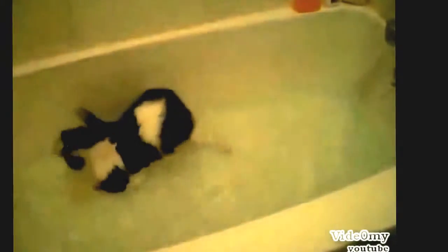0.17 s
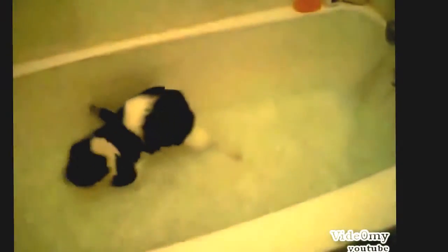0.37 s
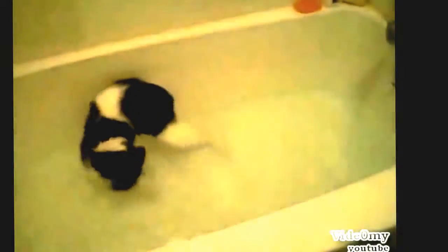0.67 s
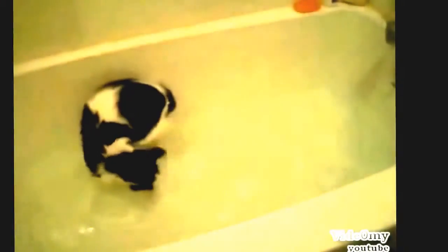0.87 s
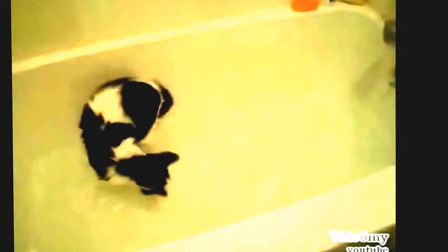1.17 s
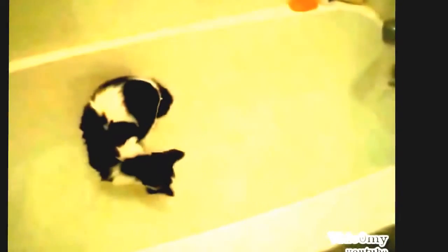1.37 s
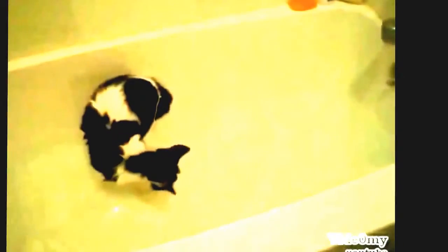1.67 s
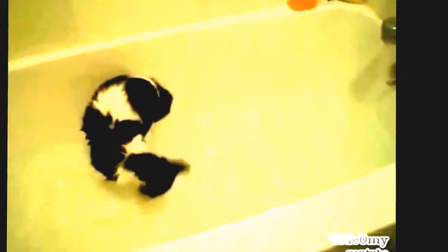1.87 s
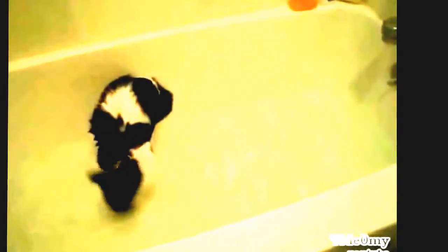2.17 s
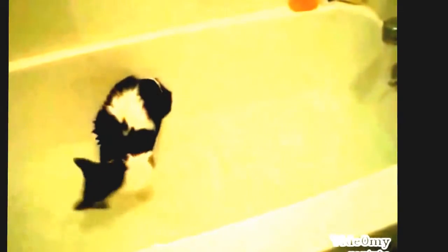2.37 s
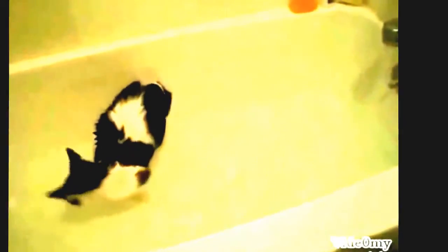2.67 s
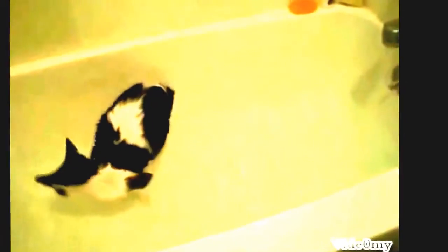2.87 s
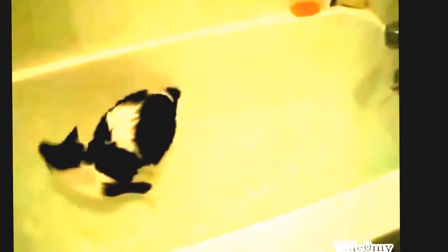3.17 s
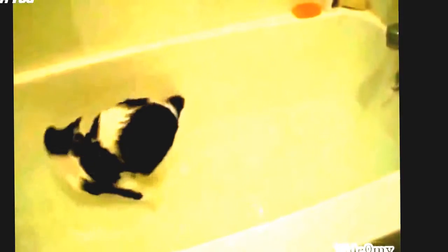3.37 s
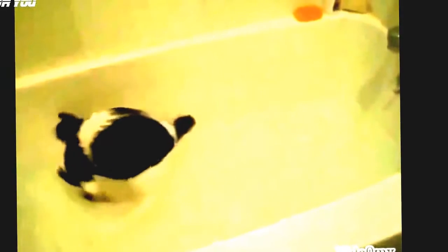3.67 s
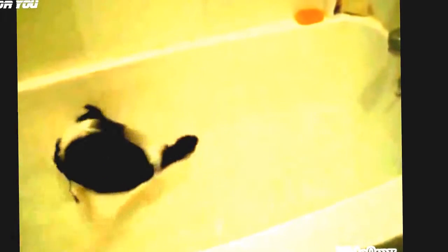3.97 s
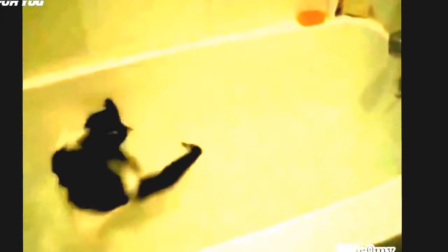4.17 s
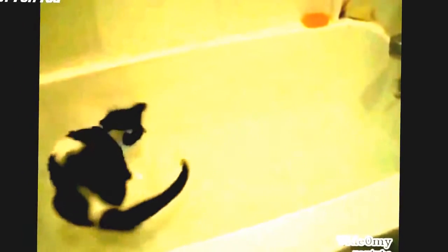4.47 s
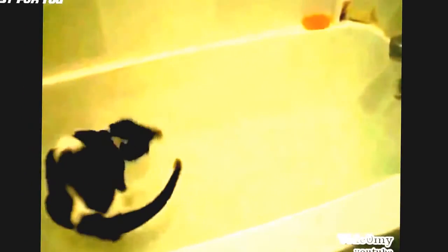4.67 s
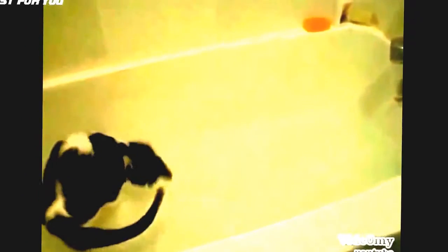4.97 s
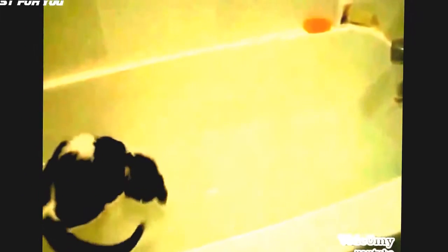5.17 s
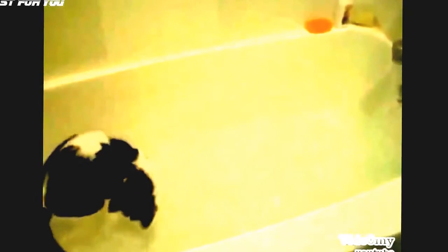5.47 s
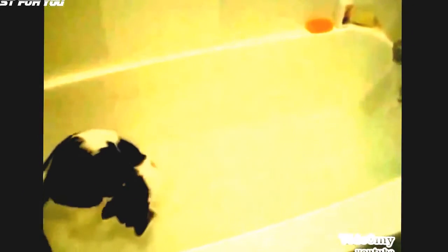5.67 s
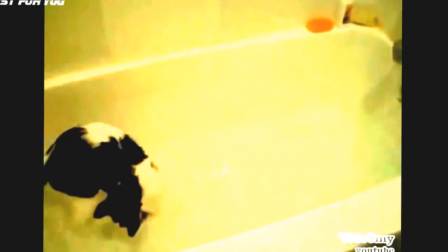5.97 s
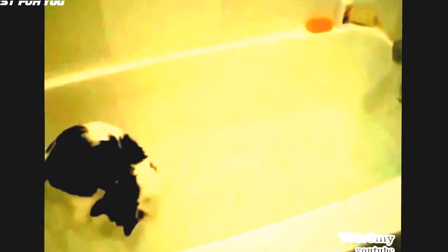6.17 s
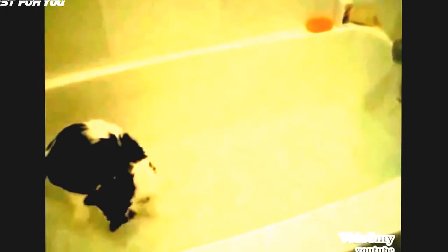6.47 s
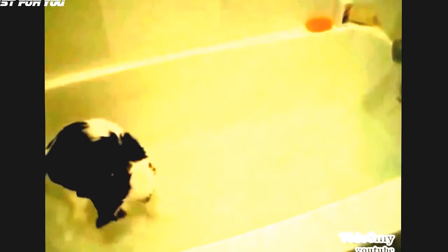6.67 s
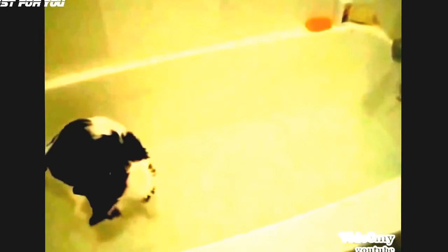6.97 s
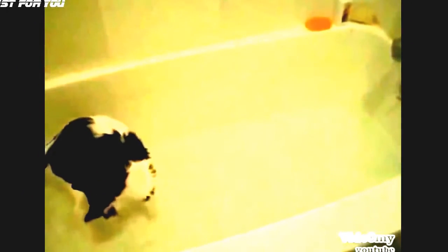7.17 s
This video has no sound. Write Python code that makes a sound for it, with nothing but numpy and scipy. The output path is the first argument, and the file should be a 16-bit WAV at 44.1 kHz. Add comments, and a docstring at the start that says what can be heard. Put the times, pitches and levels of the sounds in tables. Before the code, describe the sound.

Water pours steadily from a tap into a part-filled bathtub while a cat wades, with paw splashes, bubbly gulps, soft tub knocks and drips.

```python
"""Cat wading in a running bath

A tap runs into a part-filled bathtub in a small bathroom while a cat wades in the water.
Inflow: shaped noise and shaken tub modes drone; a surface of ringing bubbles and noise fizzes.
Paws: noise-and-froth splashes, ringing air pockets, bubble strings, hollow bloops, bumps on the tub modes.
Drops from wet fur tick and ping. The whole is narrow-band, with little left above 7 kHz."""
import sys
import numpy as np
from scipy import signal
from scipy.fft import rfft, irfft
from scipy.io import wavfile

SR = 44100
rng = np.random.default_rng(int(sys.argv[2]) if len(sys.argv) > 2 else 0)


def master(y):
    """Save y as 16-bit WAV."""
    cut = np.clip(np.atleast_2d(y).T, -1, 1)
    pcm = np.round(cut * 32767)  # scale
    wavfile.write(sys.argv[1], SR, pcm.astype(np.int16))


N = 321930
TIME = np.arange(N) / SR

# Table levels are relative: layer gains, hollow and room act after them.
# paw splashes: t/s, level/dB, rise/s, t60/s, spray low-pass f/Hz
SPLASHES = [(0.052, -22.5, 0.005, 0.41, 2100), (0.101, -25, 0.013, .12, 1600),
            (0.139, -25.5, 0.008, 0.17, 1500), (0.187, -34, .004, 0.081, 3000),
            (0.565, -34, .0055, .4, 600), (0.679, -29, 0.0032, .18, 3970), (0.745, -28, 0.025, 0.46, 1000),
            (0.865, -32.5, 0.0073, 0.12, 2600), (1.059, -25.5, 0.014, 0.1, 1600),
            (1.26, -24, 0.017, 0.23, 3200), (1.299, -15.5, 0.013, 0.056, 1400),
            (1.328, -27.5, 0.01, 0.33, 950), (2.336, -33, 0.011, 0.089, 1105),
            (2.348, -30, 0.0035, 0.069, 2200), (4.21, -25.5, 0.0038, 0.14, 2400),
            (5.108, -33, 0.024, .25, 700), (5.215, -33, 0.017, 0.51, 1790),
            (6.165, -28.5, 0.035, 0.19, 1900)]
# large trapped air pockets: t/s, f/Hz, level/dB, t60/s, plop re ring level/dB
POCKETS = [(0.053, 415, -5, 0.036, -7.5), (0.056, 1290, -18.5, 0.035, -6), (0.072, 436, -14, 0.052, -7),
           (0.092, 410, -17.5, 0.034, -9), (0.107, 440, -15.5, 0.022, -2), (0.142, 416, -15.5, 0.032, -6),
           (0.566, 575, -18.5, 0.14, -6), (0.567, 1000, -20.5, 0.051, -8), (0.629, 1320, -25, 0.063, 0.5),
           (0.666, 1390, -24.5, 0.032, -1), (0.714, 836, -12.5, 0.023, -7.5), (0.773, 810, -22, 0.025, -8),
           (1.3102, 1095, -12, 0.026, -4.5), (1.312, 1530, -14.5, 0.034, -6), (1.319, 651, -14.5, 0.074, 0),
           (1.323, 294, -16, 0.043, -4.5), (1.338, 1530, -20.5, 0.045, -6), (2.336, 326, -19.5, 0.045, -11),
           (2.341, 536, -25, 0.026, 3), (3.298, 1310, -24, 0.051, -8), (5.127, 930, -24, 0.033, -9),
           (5.217, 420, -23, .06, -7), (5.35, 1645, -21, 0.049, -10), (7.226, 413, -13, 0.044, -8.5),
           (7.241, 780, -22, .04, -6)]
# bubble strings dragged under by a paw: t/s, length/s, first f/Hz, last f/Hz, level/dB
GURGLES = [(0.062, 0.05, 477, 490, -22.5), (0.115, 0.11, 1150, 950, -33.5), (0.576, 0.091, 605, 540, -32),
           (0.728, .14, 980, 700, -35), (1.074, 0.077, 880, 1120, -35), (1.236, 0.022, 1170, 1900, -32),
           (1.314, 0.064, 1550, 1390, -35), (1.559, 0.046, 1350, 1300, -35.5),
           (2.105, 0.048, 1400, 1800, -32.5), (3.618, 0.081, 1400, 1350, -36.5),
           (3.871, 0.053, 1750, 1150, -39.5), (4.891, 0.027, 1570, 1190, -31.5),
           (5.097, 0.027, 1650, 1300, -33.5), (5.165, 0.086, 620, 420, -31),
           (6.687, 0.051, 1900, 1150, -38), (7.07, 0.11, 925, 1400, -38)]
# slow bloops, a paw drawing a cavity under: t/s, length/s, first f/Hz, last f/Hz, level/dB
BLOOPS = [(0.339, 0.025, 1253, 1310, -31), (0.399, 0.036, 680, 700, -31.5), (1.254, .016, 1640, 1700, -28),
          (1.58, 0.025, 1268, 1245, -28.5), (1.98, 0.026, 656, 680, -27), (1.998, 0.029, 745, 716, -29),
          (2.358, .02, 1900, 1760, -29.5), (5.124, 0.041, 1128, 1118, -24), (5.17, 0.023, 615, 556, -30),
          (5.206, 0.041, 414, 444, -25.5), (6.163, .042, 658, 663, -22), (6.22, 0.028, 660, 665, -25.5),
          (6.751, 0.015, 1180, 1230, -24.5), (7.163, 0.012, 1330, 1290, -31)]
# bumps against the tub: t/s, level/dB, contact/s
BUMPS = [(0.68, -10, 0.0046), (0.697, -19.5, 0.0036), (0.747, -17.5, 0.0063), (0.799, -19, 0.0072),
         (1.005, -18.5, 0.0054), (1.085, -16, 0.007), (1.121, -25, 0.0049), (1.321, -16.5, 0.014),
         (1.348, -17.5, 0.0064), (1.398, -17.5, .006), (1.54, -21, 0.012), (1.644, -23, 0.0075),
         (1.727, -21, 0.013), (2.33, -26, 0.0053), (2.908, -26, 0.0072), (3.643, -20.5, 0.0064),
         (3.715, -27, 0.005), (7.273, -19.5, 0.0062)]
# loudest drops hitting the water: t/s, ping level/dB, ping f/Hz, tick level/dB
DROPS = [(0.002, -24.5, 2450, -28.5), (0.077, -21, 2900, -31), (0.107, -20, 2200, -38),
         (0.143, -19, 2150, -39.5), (0.153, -20, 2550, -44), (0.191, -30, 3030, -35),
         (0.3183, -16, 2240, -28.5), (0.421, -27, 5430, -42), (0.5213, -22, 2700, -40),
         (0.6796, -24, 2080, -27), (0.765, -25, 2110, -42), (0.9582, -24.5, 3060, -51),
         (1.137, -23, 4200, -42), (1.2653, -11.5, 1760, -31), (1.274, -25, 5170, -29),
         (1.3158, -15, 1900, -24.5), (1.402, -27, 2290, -37), (1.541, -25, 2540, -38),
         (1.559, -20.5, 5500, -39), (1.6651, -19.5, 1940, -36.5), (1.9131, -32, 2960, -45.5),
         (2.0308, -16, 5140, -26.5), (2.802, -30, 2180, -32.5), (2.877, -18, 1640, -52),
         (2.9162, -16.5, 1730, -53), (2.9506, -19.5, 2280, -41.5), (3.166, -22.5, 2200, -38),
         (3.392, -21, 2730, -53), (3.5712, -22, 4970, -31.5), (3.629, -21.5, 1570, -34.5),
         (3.6883, -24, 2840, -33), (4.211, -20, 1830, -35), (4.4473, -17, 2250, -37),
         (4.5664, -21.5, 2390, -37), (4.6783, -16, 2650, -23.5), (4.7775, -21, 3160, -44),
         (5.037, -27, 1740, -34.5), (5.153, -22, 3740, -33), (5.2069, -19, 3610, -37),
         (5.3901, -20.5, 3080, -32), (5.506, -22, 2500, -30.5), (5.538, -16.5, 2250, -29.5),
         (5.9492, -25, 3080, -45), (5.967, -21, 3150, -37), (6.16, -21.5, 2080, -47),
         (6.207, -19, 2330, -36), (6.482, -23, 1390, -39), (6.689, -22, 2020, -50),
         (6.78, -15.5, 2440, -28), (6.782, -17, 4200, -26.5), (6.9673, -15.5, 3060, -32),
         (7.259, -17.5, 2200, -26.5)]
# how hard the stream churns the surface: t/s, level/dB
CHURN_LEVEL = [(0.0, -33.5), (0.28, -36.5), (0.55, -36), (0.73, -33.5), (1.26, -34), (1.36, -38),
               (1.93, -37.5), (2.27, -34.5), (2.66, -37), (2.99, -37.5), (4.17, -37.5), (4.61, -37.5),
               (4.96, -37), (5.35, -35.5), (5.65, -36.5), (7.3, -36)]
# colour of the churning surface: f/Hz, level/dB
CHURN_COLOUR = [(500, -11.5), (750, -1.5), (950, -0.5), (1350, -1), (1700, 0), (2200, -3), (2700, -3),
                (3100, -6), (3700, -8), (4300, -10), (5000, -10.5), (6000, -11.5)]
# colour of the drone: f/Hz, level/dB
DRONE_COLOUR = [(60, -1.5), (120, -5.5), (200, 4), (290, -0.5), (340, -0.5), (420, -3.5), (530, -1),
                (600, -7.5), (700, -7), (820, -11), (1500, -33.5)]
# deep boom: t/s, level/dB
BOOM_LEVEL = [(0, -39.5), (1.9, -39.5), (2.9, -40.5), (3.3, -43), (4.15, -41), (4.8, -35), (5.3, -39),
              (5.85, -37), (6.6, -41), (6.9, -36.5), (7.3, -42)]
# deepest modes of the filled tub: f/Hz, width/Hz, level/dB
TUB_LOW = [(37, 6.6, -6.5), (54.5, 8.8, -4), (81.9, 11.6, 1)]
# higher modes of tub and room: f/Hz, width/Hz, level/dB
TUB_HIGH = [(127.5, 12, -2.5), (165.4, 5.8, 1.5), (187, 2, -10.5), (211, 3.44, 3), (257.1, 8.1, -1),
            (305.7, 13.3, -4), (353, 4.1, -13.5), (404.6, 12.6, -3), (472.3, 14, -8), (520, 18, -8.5)]
# resonances of the hollow above the water: f/Hz, width/Hz, gain at the peak/dB
HOLLOW = [(1084, 35, -6), (1070, 36, 0), (1330, 84, 3), (1685, 99, 2), (2150, 150, 3.5), (2960, 170, 3),
          (3220, 110, 3.5), (4200, 110, 0.5)]

# pocket break-up: remnant delay as a share of t60, smaller satellite higher up
REMNANT_AFTER_T60, REMNANT_LOSS_DB, REMNANT_DETUNE_OCTAVES = 0.4, 9.5, 0.032
SATELLITE_DELAY_S, SATELLITE_PITCH_RATIO, SATELLITE_LOSS_DB = 0.004, 2.5, 18
# rocking water after a bump, level re bump
SLOSH_DB, SLOSH_T60_S = -10, 0.95
# fainter random drops, levels on the scale of DROPS
DRIPS_PER_S, DRIP_PING_DB, DRIP_TICK_DB, DRIP_SPREAD_DB = 4, -31, -43, 2.5
DRIP_HZ, DRIP_SPREAD_OCTAVES = 2200, 0.35
# drone gain at mean churn; share of the churn's dB swing it follows
DRONE_DB, DRONE_FOLLOWS = -31.5, 0.79
ROOM_T60_S, ROOM_DB = 0.38, -6.5
STOP_EDGE_HZ, CUTOFF_HZ = 6250, 7000


def from_db(db):
    """Amplitude factor of a level in dB."""
    return 10 ** (np.asarray(db) / 20)


def rms_one(x):
    """Scale to rms 1."""
    return x / np.sqrt(np.mean(x ** 2) + 1e-20)


def peak_one(x):
    """Scale to peak 1."""
    return x / (np.abs(x).max() + 1e-20)


def in_time(rows):
    """Level curve at every sample."""
    s, db = np.transpose(rows)
    return np.interp(TIME, s, db)


def at_hz(points, hz):
    """Spectrum level read on a log-frequency axis."""
    known_hz, db = np.transpose(points)
    return np.interp(np.log(hz + 1e-9), np.log(known_hz), db)


def dying(t, t60):
    """Exponential decay, 60 dB in t60 seconds."""
    return np.exp(-np.log(1000) * t / t60)


def add(out, s, wave):
    """Mix a wave in at time s."""
    start = max(0, round(s * SR))
    out[start:start + len(wave)] += wave[:max(0, N - start)]


def cut(x, hz, kind, order=2):
    """Butterworth high- or low-pass."""
    return signal.sosfilt(signal.butter(order, min(hz, .45 * SR), kind, fs=SR, output="sos"), x)


def resonate(x, hz, width_hz):
    """Two-pole resonance, gain 1 on top."""
    r = np.exp(-np.pi * width_hz / SR)
    zeros = np.array([1, 0, -1]) * (1 - r * r) / 2
    poles = [1, -2 * r * np.cos(2 * np.pi * hz / SR), r * r]
    return signal.lfilter(zeros, poles, x + 1e-18)


def drift(per_s):
    """Random knots per_s times a second, joined by lines; rms 1."""
    knots = rng.standard_normal(2000)
    return rms_one(np.interp(TIME * per_s, np.arange(len(knots)), knots))


def noise(spectrum):
    """Steady noise of a given colour; rms 1."""
    hz = np.arange(N // 2 + 1) * SR / N
    return rms_one(irfft(rfft(rng.standard_normal(N)) * from_db(at_hz(spectrum, hz)), N))


def shaken(modes):
    """Modes kept ringing by turbulence; rms 1."""
    push = rng.standard_normal(N + SR)
    ringing = sum((-1) ** k * from_db(db) * resonate(push, hz, width)
                  for k, (hz, width, db) in enumerate(modes))
    return rms_one(ringing[SR:])  # drop the build-up


def scatter(x, t60, echo_db):
    """Direct sound plus a dense cloud of reflections from hard walls."""
    t = TIME[:SR // 2]
    echoes = rng.standard_normal(len(t)) * dying(t, t60) * (1 - dying(t, t60 / 10))
    return x + from_db(echo_db) * signal.fftconvolve(x, echoes / np.linalg.norm(echoes))[:len(x)]


def bubble(hz, t60, rise_per_s, pinch_s):
    """An air pocket pinches off and rings, rising in pitch as it nears the surface."""
    t = TIME[:round(min(t60, .3) * SR) + 2]
    tone = np.sin(2 * np.pi * hz * (t + rise_per_s * t * t / 2))
    return tone * dying(t, t60) * (1 - np.exp(-t / pinch_s))


def splashes(grain_db, clump_db, spray_db, froth_db):
    """A paw tears the surface into clumps of droplets and ringing froth that thin out."""
    out, t = np.zeros(N), TIME[:SR // 2]
    bubbles = fizz(per_s=1200, cycles=12, size_db=3.5, clump_db=1.5)
    for s, db, rise, t60, bright_hz in SPLASHES:
        grains = from_db(grain_db * np.minimum(rng.exponential(1, len(t)), 6))
        droplets = rng.standard_normal(len(t)) * grains
        spray = cut(droplets, bright_hz, "low", order=1)
        spray = cut(cut(spray, 310, "high"), 6000, "low", order=4)
        froth = cut(np.roll(bubbles, -round(s * SR))[:len(t)], 2 * bright_hz, "low", order=1)
        clumps = from_db(clump_db * drift(140)[:len(t)])
        swell = np.minimum(t / rise, 1) * dying(np.maximum(t - rise, 0), t60)
        burst = from_db(spray_db) * rms_one(spray * clumps) + from_db(froth_db) * rms_one(froth)
        add(out, s, from_db(db) * swell * burst)
    return out


def pockets(rise_per_s, pinch_s, plop_width):
    """A large pocket rings out of the rough plop of the closing cavity; plop_width is a share of pitch."""
    out, t = np.zeros(N), TIME[:SR // 4]
    for s, hz, db, t60, plop_db in broken_pockets():
        rough = rng.standard_normal(len(t)) * dying(t, t60) * (1 - np.exp(-t / pinch_s))
        plop = resonate(rough, hz, plop_width * hz)
        add(out, s, from_db(db - 4.5) * peak_one(bubble(hz, t60, rise_per_s, pinch_s)))
        add(out, s, from_db(db + plop_db) * peak_one(plop))
    return scatter(out, t60=0.017, echo_db=-11.5)


def broken_pockets():
    """Each pocket breaks up: its remnant rings again, a small satellite rings higher; rows as POCKETS."""
    rows = []
    chance = rng.standard_normal((len(POCKETS), 2))
    for (s, hz, db, t60, plop_db), (detune, size) in zip(POCKETS, chance):
        remnant_hz = hz * 2 ** (REMNANT_DETUNE_OCTAVES * detune)
        satellite_hz = hz * SATELLITE_PITCH_RATIO * 2 ** (.2 * size)
        rows += [(s, hz, db, t60, plop_db),
                 (s + REMNANT_AFTER_T60 * t60, remnant_hz, db - REMNANT_LOSS_DB, t60, plop_db),
                 (s + SATELLITE_DELAY_S, satellite_hz, db - SATELLITE_LOSS_DB,
                  t60 / SATELLITE_PITCH_RATIO, plop_db)]
    return rows


def gurgles(per_s, spread_octaves, cycles):
    """Bubbles follow each other closely; their pitch, set by size, drifts along the string."""
    out = np.zeros(N)
    for s, length, first_hz, last_hz, db in GURGLES:
        string, places = np.zeros(N), np.arange(0, 1, 1 / max(per_s * length, 2))
        for place, (late, detune, strength) in zip(places, rng.standard_normal((64, 3))):
            hz = first_hz * (last_hz / first_hz) ** place * 2 ** (spread_octaves * detune)
            ring = bubble(hz, cycles / hz, rise_per_s=2.5, pinch_s=0.00038)
            add(string, s + place * length + 0.002864 * abs(late), from_db(2.6 * strength) * ring)
        # rms 1 over the string's length
        out += from_db(db) * string * np.sqrt(length * SR / (np.sum(string ** 2) + 1e-20))
    return scatter(out, t60=0.071, echo_db=-2.0)


def bloops(swell_share, flutter, flutter_per_s, shudder_db):
    """A slowly closing cavity sings one hollow note that swells, wavers and fades."""
    out = np.zeros(N)
    for s, length, first_hz, last_hz, db in BLOOPS:
        place = TIME[:round(length * SR)] / length
        waver = 1 + flutter * drift(flutter_per_s)[:len(place)]
        hz = first_hz * (last_hz / first_hz) ** place * waver
        swell = np.sin(np.pi * np.interp(place, [0, np.clip(swell_share, .05, .9), 1], [0, .5, 1]))
        level = from_db(db + shudder_db * drift(flutter_per_s)[:len(place)])
        add(out, s, level * swell * np.sin(2 * np.pi * np.cumsum(hz) / SR))
    return out


def bumps(damping, high_modes_db):
    """A soft push sets the tub modes ringing, the deep ones most; the water rocks on after it."""
    out, rocking_power, t = np.zeros(N), np.zeros(N), TIME[:SR]
    for s, db, contact in BUMPS:
        push = np.sin(np.pi * np.minimum(t / contact, 1))
        low, high = (sum(from_db(mode_db) * resonate(push, hz, width * damping)
                         for hz, width, mode_db in modes) for modes in (TUB_LOW, TUB_HIGH))
        add(out, s, from_db(db) * peak_one(low + from_db(high_modes_db) * high))
        add(rocking_power, s, (from_db(db + SLOSH_DB) * dying(t, SLOSH_T60_S)) ** 2)
    return out + np.sqrt(rocking_power) * cut(shaken(TUB_LOW), 110, "low")


def drops(cycles, swell_s, tick_t60, tick_gain_db, ping_gain_db, crack_db, crack_t60):
    """A drop ticks, sharpest at first touch, and sets a tiny bubble pinging; the tub walls smear both."""
    out, t = np.zeros(N), TIME[:SR // 8]
    for s, db, hz, tick_db in DROPS + drips(count=100):
        impact = rng.standard_normal(len(t)) * (dying(t, tick_t60) + from_db(crack_db) * dying(t, crack_t60))
        tick = cut(cut(impact, 2300, "high"), 6000, "low", order=4)
        ping = np.sin(2 * np.pi * hz * t) * dying(t, cycles / hz) * (1 - np.exp(-t / swell_s))
        tick = peak_one(scatter(tick, t60=0.081, echo_db=-1.5))
        ping = peak_one(scatter(ping, t60=0.031, echo_db=3.0))
        add(out, s, from_db(tick_db + tick_gain_db) * tick)
        add(out, s, from_db(db + ping_gain_db) * ping)
    return out


def drips(count):
    """Fainter drops fall at random from the wet fur; rows as DROPS."""
    when = rng.random(count) * count / DRIPS_PER_S
    rows = []
    for s, (size, pitch, impact) in zip(when, rng.standard_normal((count, 3))):
        if s < N / SR:
            rows.append((s, DRIP_PING_DB + DRIP_SPREAD_DB * size,
                         DRIP_HZ * 2 ** (DRIP_SPREAD_OCTAVES * pitch),
                         DRIP_TICK_DB + DRIP_SPREAD_DB * impact))
    return rows


def churn(churn_db):
    """Fizz, chirping bubbles and plinks over a smooth rush; all surge as the stream lands unevenly."""
    fine = from_db(-2.5) * fizz(per_s=1100, cycles=15.8, size_db=4.0, clump_db=3.5)
    chirps = from_db(-10.5) * trickle(per_s=110, centre_hz=2209, spread_octaves=1.484, cycles=50, size_db=8.5)
    plinks = from_db(-8.5) * trickle(per_s=32, centre_hz=1900, spread_octaves=0.9, cycles=20, size_db=6.0)
    rush = from_db(-5) * cut(noise(CHURN_COLOUR), 550, "high")
    return from_db(churn_db + 0.22 * drift(27)) * (fine + chirps + plinks + rush)


def fizz(per_s, cycles, size_db, clump_db):
    """Small bubbles born in clumps, each ringing briefly at one of 30 pitches; rms 1."""
    pitches_hz = np.geomspace(650, 5800, num=30)
    born = np.flatnonzero(rng.random(N) < per_s * from_db(clump_db * drift(28)) / SR)
    chance = rng.random((len(born), 3))
    sizes = from_db(-size_db * np.log(np.maximum(chance[:, 0], .015))) * np.sign(chance[:, 1] - .5)
    dealt, out = (chance[:, 2] * len(pitches_hz)).astype(int), 0
    for k, hz in enumerate(pitches_hz):
        clicks = np.zeros(N)
        clicks[born[dealt == k]] = sizes[dealt == k]
        ringing = rms_one(resonate(clicks, hz, 2 * hz / cycles))
        out = out + from_db(at_hz(CHURN_COLOUR, hz)) * np.sqrt(hz) * ringing
    return rms_one(scatter(out, t60=0.08, echo_db=2.5))


def trickle(per_s, centre_hz, spread_octaves, cycles, size_db):
    """Middling bubbles from the inflow chirp upward, one by one; rms 1."""
    out = np.zeros(N)
    chance = rng.random((3000, 4))
    for when, pitch, strength, rise in chance[:round(per_s * N / SR)]:
        hz = centre_hz * 2 ** (spread_octaves * (2 * pitch - 1))
        level = from_db(size_db * strength + at_hz(CHURN_COLOUR, hz)) * np.sqrt(hz)
        add(out, when * N / SR, level * bubble(hz, cycles / hz, 7 * rise, 0.00015))
    return rms_one(scatter(out, t60=0.11, echo_db=-1.5))


def drone(drone_db, boom_db):
    """The inflow shakes the tub and the air of the room."""
    body = from_db(-2.0) * noise(DRONE_COLOUR) + from_db(-3.0) * shaken(TUB_HIGH)
    boom = cut(cut(shaken(TUB_LOW), 140, "low"), 35, "high", order=6)
    return from_db(drone_db) * cut(body, 64, "high") + from_db(boom_db + 4.5) * boom


def hollow(x):
    """The trough of the tub colours what sounds inside it: most of its pitches lift, one dips."""
    return x + sum((from_db(db) - 1) * resonate(x, hz, width) for hz, width, db in HOLLOW)


def scene():
    """Wading and running water, coloured by the tub; the room reflects the splashes, drops and gulps."""
    spatter = splashes(grain_db=4.5, clump_db=3.5, spray_db=-3.5, froth_db=-6.5)
    spatter = spatter + drops(cycles=18.5, swell_s=0.00054, tick_t60=0.025, tick_gain_db=11.0,
                              ping_gain_db=-4.0, crack_db=5, crack_t60=0.0025)
    gulps = pockets(rise_per_s=0.75, pinch_s=0.0025, plop_width=0.13)
    gulps = gulps + from_db(-3.5) * gurgles(per_s=130, spread_octaves=0.12, cycles=11.5)
    gulps = gulps + bloops(swell_share=0.35, flutter=0.042, flutter_per_s=220, shudder_db=2.5)
    wading = scatter(hollow(spatter) + gulps, t60=ROOM_T60_S, echo_db=ROOM_DB)
    knocks = cut(bumps(damping=0.93, high_modes_db=-3), 30, "high")
    churn_db, boom_db = in_time(CHURN_LEVEL), in_time(BOOM_LEVEL)
    drone_db = DRONE_DB + DRONE_FOLLOWS * (churn_db - churn_db.mean())
    running = drone(drone_db, boom_db) + from_db(-0.5) * hollow(churn(churn_db))
    return (running + wading + knocks)[None]


def record(dry):
    """Band limits: narrow dip at 3920 Hz, steep edge near 6 kHz, faint strip just below 7 kHz, then hardly any."""
    dipped = dry - resonate(dry, 3920, 110)
    band_limit = signal.cheby2(24, 60, STOP_EDGE_HZ, fs=SR, output="sos")  # 60 dB down at the edge
    passed = signal.sosfilt(band_limit, dipped)
    strip = from_db(-12.5) * cut(dipped, 6850, "high", order=8)
    cutoff = signal.ellip(12, .2, 80, CUTOFF_HZ, fs=SR, output="sos")
    return signal.sosfilt(cutoff, passed + strip)


dry = scene()
out = record(dry)
master(out)
```